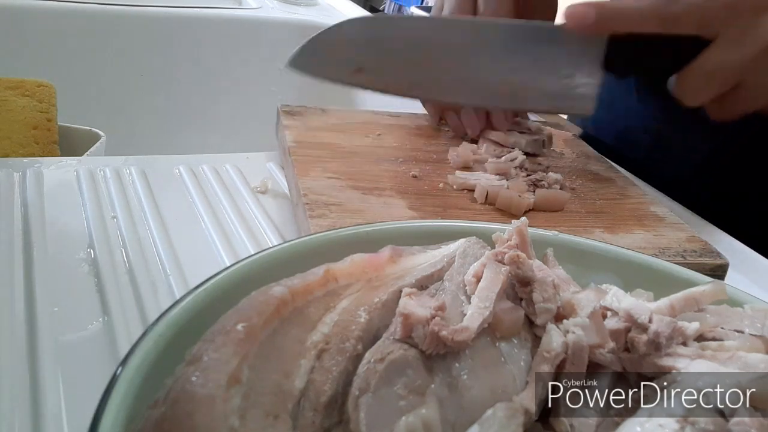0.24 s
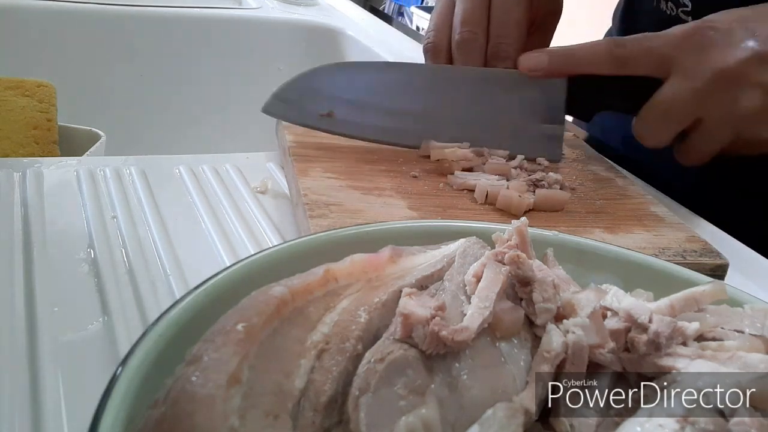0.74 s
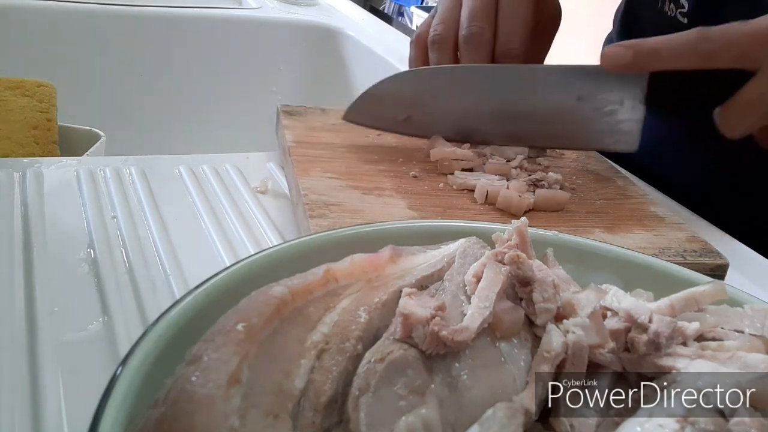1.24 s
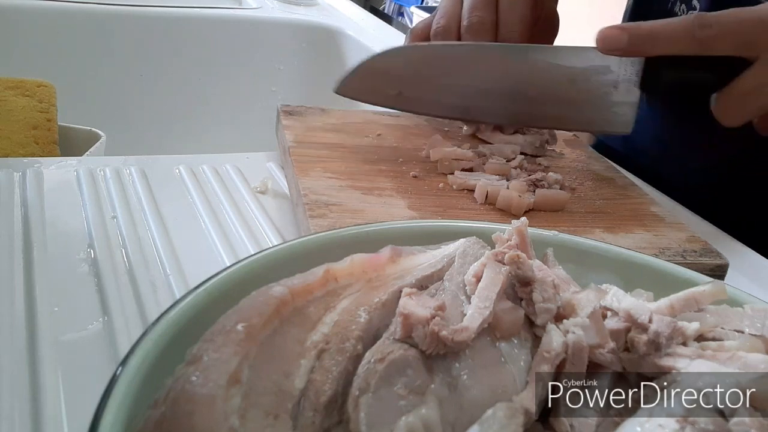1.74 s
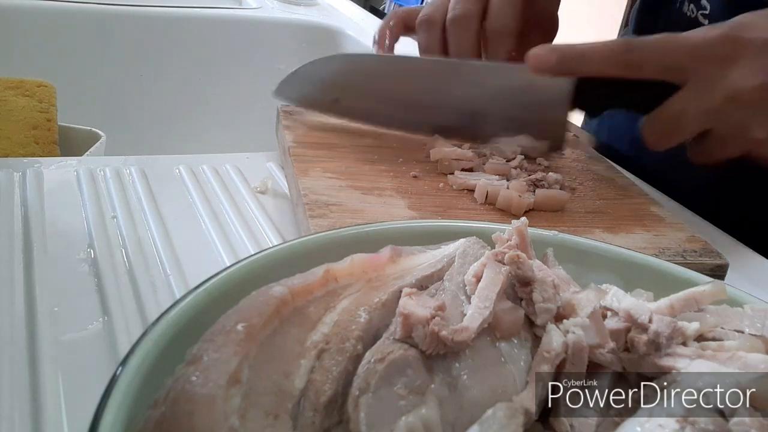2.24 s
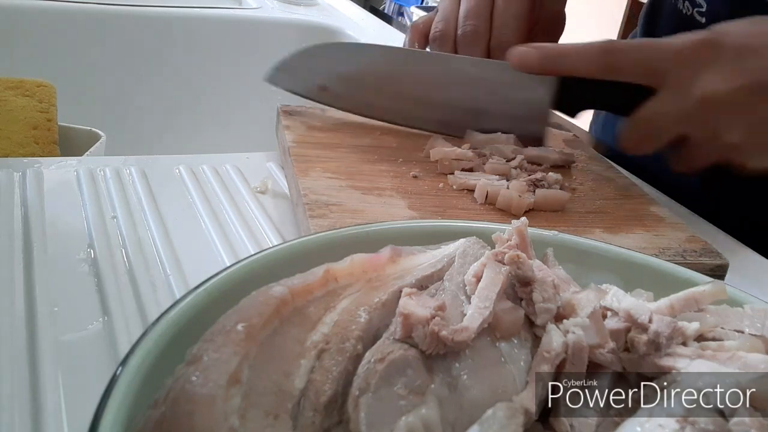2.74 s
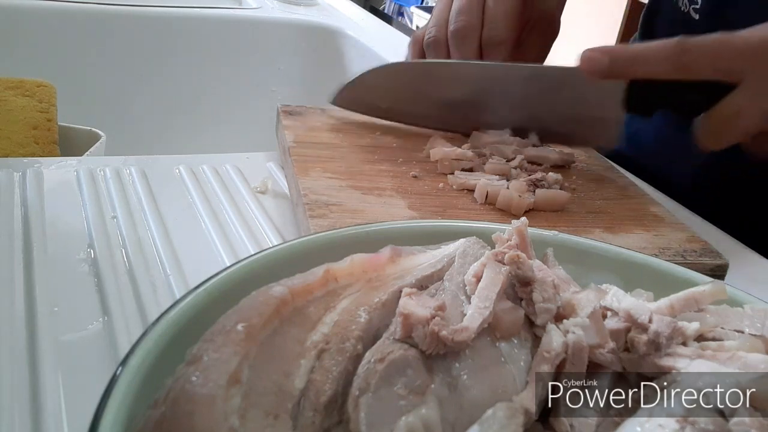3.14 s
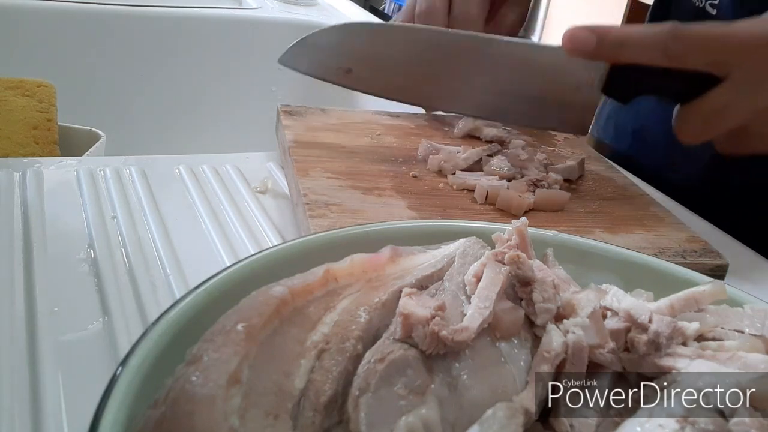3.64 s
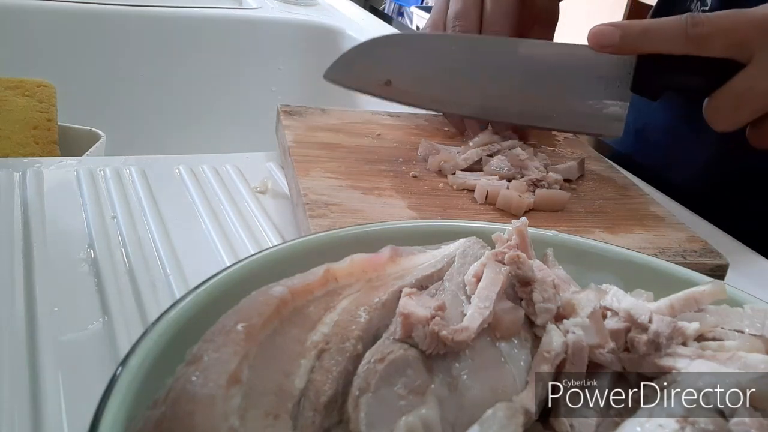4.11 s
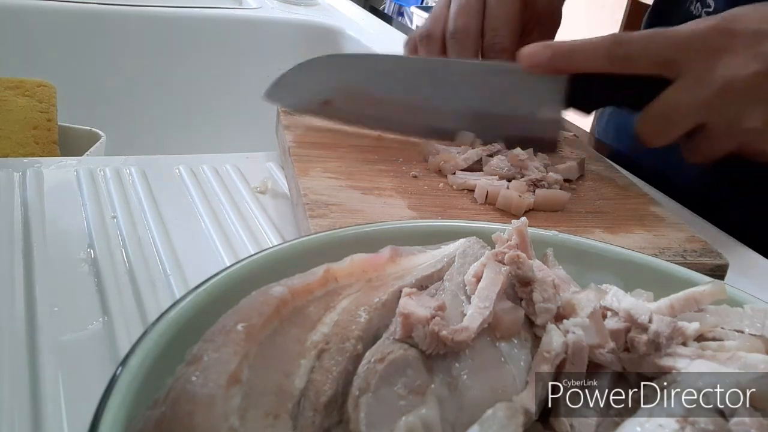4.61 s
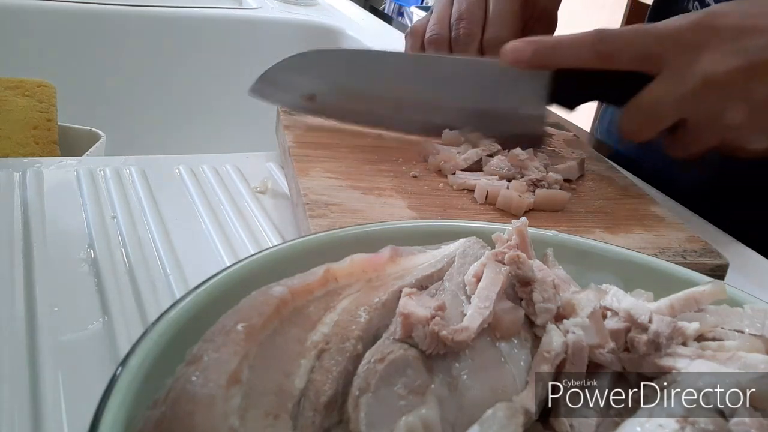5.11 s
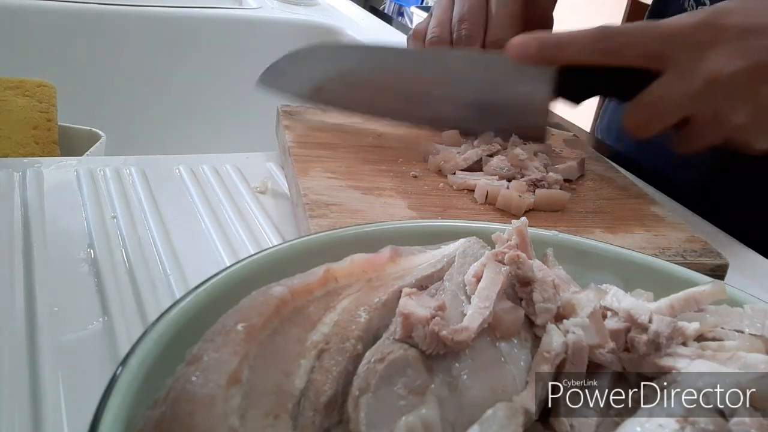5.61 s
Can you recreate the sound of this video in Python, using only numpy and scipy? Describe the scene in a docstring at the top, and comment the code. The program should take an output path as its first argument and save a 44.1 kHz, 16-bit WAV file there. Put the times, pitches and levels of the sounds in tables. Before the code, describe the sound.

A small kitchen with a continuous low, slightly wavering appliance hum and uneven, wide fan hiss. Close to the microphone, a knife cuts cooked meat on a wooden board. The tail of a stroke is heard at the start, then a bright wet smack at 0.6 s. A deep, dull knock lands at 0.8 s, a clearer woody one at 1.5 and a softer one at 2.2. The sharpest, loudest knock comes at 2.8 s. Three strokes follow closer together at 3.3, 3.5 and 3.8, the later ones lighter, with a tiny blade tone and squeak. After a pause, a weak stroke comes at 4.6, faint gliding squeaks until 5.1, a fuller knock there, and a last soft one at 5.6. Most strokes have a double bump from edge and heel, a short low boom, faint scraping and crisp wet tearing. Sticky smacks recur, and short reflections surround everything.

```python
"""Chopping cooked meat on a wooden board

In a small kitchen a knife squelches through meat and knocks on a board, a sum of decaying modes.
Tearing fibres and the dragging edge are showers of tiny filtered snaps; wet meat smacks in noise bursts.
Faint short gliding tones are the blade ringing near 1770 Hz, and squeaks.
Behind it an appliance runs steadily: wavering hum tones, and uneven fan noise shaped by resonances.
"""
import sys
import numpy as np
from scipy import signal
from scipy.fft import rfft, irfft
from scipy.io import wavfile
from scipy.ndimage import uniform_filter1d

SR = 44100
rng = np.random.default_rng(int(sys.argv[2]) if len(sys.argv) > 2 else 0)


def store_pcm(level_fs):
    """Save levels as 16-bit WAV."""
    pcm = np.round(np.clip(level_fs, -1, 1) * 32767).astype(np.int16)
    wavfile.write(sys.argv[1], SR, np.atleast_2d(pcm).T)


N = 258426  # length [samples]

# Levels are relative: later gains and the echoes shift most of them.
# Strokes: (time [s], clack level [dB], boom level [dB], thud level [dB], ring length [factor],
# hardness [dB per octave], heel delay [s], extra heel boom [dB], push length [s], pressure [dB])
STROKES = [(-.075, -36, -26, -28, 0.64, 0, .03, -8, .075, 2),
           (0.8265, -35, -14, -13, 0.35, -7, 0.026, -6, .058, -1),
           (1.486, -28, -16.5, -25, .95, -3, 0.03, -7, .086, -0.5),
           (2.196, -38.5, -20.5, -19, 0.27, 6, 0.034, -3, .09, -6.5),
           (2.796, -22.5, -13.5, -21.5, 0.94, -1.5, .021, -4, .076, 0),
           (3.3372, -32.5, -15, -26, 0.39, -6, .0265, 5.5, .074, 0.5),
           (3.536, -41.5, -25, -24.5, 0.37, -12.5, 0.019, -17, .035, -8),
           (3.829, -39.5, -22.5, -37, 0.47, -6, 0.022, -3, .035, -16),
           (4.597, -39, -32, -32, 0.61, 3, .035, -5, .055, 1),
           (5.116, -34.5, -19.5, -23.5, 0.68, -1, 0.039, -4, .065, -3),
           (5.582, -37, -33, -24.5, .57, 7, 0.016, 3.5, .086, -1.5)]
# Heel of the blade following the edge, before the stroke's extra boom: (clack level [dB],
# boom level [dB], thud level [dB], ring length [factor], hardness [dB per octave])
HEEL = (-42, -27, -34, 0.94, 4)
# Blade settling as the push ends, before the stroke's pressure: (clack level [dB],
# boom level [dB], thud level [dB], ring length [factor], hardness [dB per octave])
SETTLE = (-37.5, -26.5, -29, 0.35, 2)
# Upper modes of the board on the worktop, t60 before the ring length factor:
# (frequency [Hz], level [dB], t60 [s], build-up [s])
BOOM_MODES = [(257, -7, 0.13, 0.0046), (313.5, -6, 0.14, 0.0026), (333.6, -1, 0.27, 0.0057),
              (337, -28, 0.073, 0.0065)]
# Lower modes of the same: (frequency [Hz], level [dB], t60 [s], build-up [s])
THUD_MODES = [(133, -5.5, 0.13, 0.0037), (171.6, -6.5, 0.21, 0.013), (203, -14, 0.18, 0.0022)]
# Short modes of the wood, before hardness: (frequency [Hz], level [dB], t60 [s])
WOOD_MODES = [(413, -0.5, 0.039), (525, 2.5, 0.052), (594, -7, 0.055), (676, -1.5, 0.029), (797, -4, 0.044),
              (888, -4.5, 0.054), (1023, -8, 0.082), (1133, 0.5, 0.032), (1290, -11, 0.036),
              (1498, -1.5, 0.045), (1694, -4.5, .045), (2060, -33, 0.022), (2340, -11, 0.041),
              (2700, -16.5, .03), (4200, -14, 0.028)]
# Drag of the edge on the wood, before pressure: (attack [s], release [s], level [dB])
SCRAPE = (.012, 0.015, -45.5)
# Tearing of the meat, before pressure: (attack [s], release [s], level [dB])
SQUELCH = (0.0085, 0.021, -53.5)
# Dense modes of the wood under a dragging edge: (frequency [Hz], level [dB])
SCRAPE_SPECTRUM = [(40, -64), (200, -8), (430, 6), (560, 2.5), (720, -6.5), (1100, 2), (1350, -3.5),
                   (1750, 1), (2300, -9), (3200, -12.5), (6000, -23.5), (15000, -43)]
# Spectrum of the wet snaps: (frequency [Hz], level [dB])
FIZZ_SPECTRUM = [(1500, -31), (3000, 2), (4500, 3.5), (7000, 0), (9000, 3), (11000, -1), (12500, 2.5),
                 (15500, 0)]
# Fingers shifting the meat between strokes: (time [s], level [dB])
NUDGES = [(.325, -54.5), (1.317, -54), (1.885, -55), (4.03, -53)]
# Wet meat parting from steel or fingers: (time [s], level [dB], centre frequency [Hz])
SMACKS = [(0.5959, -31.5, 10800), (.603, -37, 12000), (1.478, -44, 9000), (2.932, -37, 9500),
          (3.796, -38.5, 5860), (3.944, -43.5, 13000), (4.628, -41, 8000), (5.229, -36.5, 12700),
          (5.33, -40.5, 6000)]
# Faint short tones, the blade ringing near 1770 Hz, and squeaks:
# (time [s], length [s], start frequency [Hz], end frequency [Hz], level [dB])
SHORT_TONES = [(0.821, 0.017, 1750, 1770, -40), (3.547, .029, 1777, 1770, -43),
               (3.556, 0.053, 830, 794, -42), (4.797, 0.039, 2480, 2670, -47),
               (4.912, 0.073, 2300, 2004, -44.5), (4.992, 0.016, 695, 716, -35),
               (5.063, 0.014, 735, 720, -41), (5.29, 0.066, 4250, 4080, -57)]
# Mains hum and fan tones, rms before the waver:
# (frequency [Hz], rms level [dB], phase between the ears [rad], waver [share of the tone])
HUM_TONES = [(100.6, -44.5, 0.22, .03), (199, -60, 0.18, 0.88), (287.9, -45.5, 0.12, 0.63),
             (294.3, -42.5, 0.29, 0.047), (389.8, -53.5, 0.47, 0.19), (390.8, -63, 0.5, 0.13),
             (579.5, -54.5, 2.44, 0.36), (592.3, -59.5, 1.26, 0.54), (601.7, -58.5, 1.3, 0.34),
             (703, -75, 0.43, .2), (863, -69.5, .4, 0.24), (881.5, -61, 1.77, 0.53), (3350, -69, 1.4, 0.34)]
# Rush of air from the fan: (frequency [Hz], relative spectral level [dB])
AIR_SPECTRUM = [(20, -26), (45, -5), (65, -3), (130, 1.5), (400, 0), (650, -5), (1150, -3), (1400, -7),
                (2200, -5), (3500, -14), (7000, -17), (11000, -19.5), (13000, -18.5), (15500, -22.5)]
# Resonances that the air excites: (frequency [Hz], width [Hz], level above the rush [dB])
DUCT_RESONANCES = [(177, 12, 6), (209, 34, 5.5), (260, 18, 10), (293, 27, 10.5), (341.2, 31, 15.5),
                   (483, 130, 2), (4230, 740, 5.5), (9000, 550, 4), (12100, 300, 3.5)]
# Likeness of the air in the two ears: (frequency [Hz], left-right correlation [-1 to 1])
EAR_CORRELATION = [(50, 0.63), (180, 1), (280, 0.84), (350, 0.64), (430, -0.022), (560, 0.31), (720, 0.94),
                   (950, -0.21), (2000, -0.016), (15000, -0.039)]
# Balance of the air: (frequency [Hz], left minus right [dB])
EAR_BALANCE = [(300, -1.5), (1000, -1.5), (3000, -1.2), (7000, -3), (10000, 0), (15000, 0)]
# Unevenness of the hiss: (frequency [Hz], depth [dB])
UNEVEN_DEPTH = [(400, -0.2), (1000, 1.5), (2200, 2), (4000, 2), (14000, 2)]
# Decay of the room: (frequency [Hz], t60 [s])
ROOM_DECAY = [(150, 0.38), (500, 0.27), (1500, 0.29), (5000, 0.46), (14000, 0.12)]

MEAT_LEAD_S = 0.012  # the edge enters the meat before it reaches the wood
SCRAPE_PER_S, SQUELCH_PER_S, SNAP_SPREAD_DB = 380, 1500, 2.5  # mean snap rates, size spread
NUDGE_HALF_S = .032


def knocks():
    """Impact excitation: each landing gives a woody clack and sets the modes of the board booming."""
    low, clack = np.zeros(N), np.zeros((2, N))
    for s, clack_db, boom_db, thud_db, length, hardness in contacts():
        boom = amp(boom_db) * ring(BOOM_MODES, length, bloom_s=0.01527)
        thud = amp(thud_db) * ring(THUD_MODES, length, bloom_s=0.0082)
        add(low, s, boom + thud)
        add(clack, s, amp(clack_db - 3) * whack(hardness, clack_db))
    board = kitchen(low, early_db=-22, tail_db=-20, early_s=.012)
    board += kitchen(clack, early_db=-3.5, tail_db=-3.0, early_s=0.0047) * amp([[-.7], [.7]])
    # a board this small radiates almost no deep bass
    return signal.sosfilt(signal.butter(3, 105, "highpass", fs=SR, output="sos"), board)


def contacts():
    """Successive impacts: the edge lands, the heel follows, the blade settles as the push ends."""
    for s, *edge, heel_s, rock_db, push_s, press_db in STROKES:
        yield s, *edge
        clack_db, boom_db, thud_db, length, hardness = HEEL
        yield s + heel_s, clack_db, boom_db + rock_db, thud_db, length, hardness
        clack_db, boom_db, thud_db, length, hardness = SETTLE
        yield s + push_s, clack_db + press_db, boom_db + press_db, thud_db + press_db, length, hardness


def ring(modes, length, bloom_s):
    """Modal build-up and damping: modes swell as the blow spreads into the worktop, then die away."""
    t = np.arange(SR // 2) / SR
    sound = 0
    for hz, db, t60, rise_s in modes:
        # a pressed blade shortens the decay
        decay = amp(db - 60 * t / (t60 * max(length, .1)))
        swell = 1 - np.exp(-t / rise_s)
        # the modes fall into step at bloom_s
        sound = sound + decay * swell * np.cos(2 * np.pi * hz * (t - bloom_s))
    return sound


def whack(hardness, blow_db):
    """Contact time: meat cushions a light blow, so the short wood modes start more slowly."""
    t = np.arange(SR // 5) / SR
    hz, db, t60 = np.transpose(WOOD_MODES)[:, :, None]
    # phases depend on where the edge lands and, more so at high frequency, on the ear
    landing = 0.35 * rng.random((len(hz), 1))
    ear = np.minimum(hz / 1500, 1) * rng.random((2, len(hz), 1))
    level = amp(db + hardness * np.log2(hz / 1000) - 60 * t / t60)
    modes = level * np.sin(2 * np.pi * (hz * t + landing + ear))
    contact_s = .0007 * amp(-.7 * (blow_db + 23))
    return modes.sum(1) * (1 - np.exp(-t / contact_s))


def cuts():
    """Fracture and friction: fibres tear in wet snaps, the edge drags on wood, shifted meat fizzes."""
    t = np.arange(N) / SR
    nudges = sum(amp(db) * np.exp(-((t - s) / NUDGE_HALF_S) ** 2) for s, db in NUDGES)
    tearing = drag(t + MEAT_LEAD_S, *SQUELCH)
    wet = (tearing + nudges) * snaps(FIZZ_SPECTRUM, SQUELCH_PER_S)
    scrape = drag(t, *SCRAPE) * snaps(SCRAPE_SPECTRUM, SCRAPE_PER_S)
    return kitchen(wet + scrape, early_db=0.5, tail_db=-4, early_s=0.004) * amp([[-3], [-1.5]])


def drag(t, attack_s, release_s, db):
    """Friction under load: the hand bears down, holds for the length of the push, and lets go."""
    envelope = 0
    for s, *_, push_s, press_db in STROKES:
        attack = np.clip((t - s) / attack_s, 0, 1)
        release = np.exp(-np.maximum(t - s - push_s, 0) / release_s)
        envelope = envelope + amp(db + press_db) * attack * release
    return envelope


def snaps(spectrum, per_s):
    """Shot noise: a random train of tiny snaps of uneven size, coloured and scaled to rms 1."""
    sizes = amp(SNAP_SPREAD_DB * np.minimum(rng.exponential(1, N), 3)) * rng.choice([-1, 1], N)
    train = (rng.random(N) < per_s / SR) * sizes
    return unit(signal.oaconvolve(train, click(lambda hz: read(spectrum, hz)))[:N])


def smacks():
    """Film rupture: a film of juice snaps in a few milliseconds of bright crackle with a room wash."""
    out, t = np.zeros((2, N)), np.arange(SR // 4) / SR
    parting = 1 - np.exp(-(t / .0025) ** 2)
    # the crackle dies quickly, the wash slowly
    shape = parting * (np.exp(-t / 0.0063) + amp(-5.0) * np.exp(-t / 0.049))
    for s, db, centre_hz in SMACKS:
        colour = click(lambda hz: -10 * np.log10(1 + (hz / centre_hz - centre_hz / (hz + 50)) ** 2))
        colour = colour / np.linalg.norm(colour)
        burst = shape * rng.standard_normal((2, len(t)))
        add(out, s - .001, amp(db - 4) * signal.fftconvolve(burst, colour[None], axes=1))
    return out * amp([[-1.3], [1.2]])


def short_tones():
    """Frequency modulation: blade rings and squeaks as brief gliding sines, rough in pitch and level."""
    out, wobble, roughness = np.zeros(N), drift(400), 1 + .3 * drift(250)
    for s, length_s, start_hz, end_hz, db in SHORT_TONES:
        size, first = int(length_s * SR), int(s * SR)
        hz = np.linspace(start_hz, end_hz, size) * (1 + .025 * wobble[first:][:size])
        envelope = signal.windows.tukey(size, .7) * roughness[first:][:size]
        add(out, s, amp(db - 4.0) * envelope * np.sin(2 * np.pi * np.cumsum(hz) / SR))
    return kitchen(out, early_db=-6, tail_db=-2, early_s=.008)


def hum():
    """Interaural phase: steady motor tones waver and reach each ear in their own phase."""
    t, out = np.arange(N) / SR, 0
    for hz, db, apart, waver in HUM_TONES:
        # a complex waver moves both level and phase
        wander = 1 + waver * (drift(2.55) + 1j * drift(2.7)) / np.sqrt(2)
        tone = wander * np.exp(2j * np.pi * (hz * t + rng.random()))
        ears = np.exp(.5j * apart * np.array([[-1], [1]]))
        out = out + np.sqrt(2) * amp(db) * (tone * ears).real
    return out


def air():
    """Resonant filtering of fan noise, with a correlation between the ears that varies with frequency."""
    hz = np.fft.rfftfreq(N, 1 / SR)
    left, other = rfft(rng.standard_normal((2, N)))
    alike = np.clip(read(EAR_CORRELATION, hz), -1, 1)
    ears = np.array([left, alike * left + np.sqrt(1 - alike ** 2) * other])
    peaks = 0  # extra power at the resonances
    for f, width, db in DUCT_RESONANCES:
        peaks = peaks + (amp(db) ** 2 - 1) / (1 + ((hz - f) / (width / np.sqrt(2))) ** 2) ** 2
    ears = ears * amp(read(AIR_SPECTRUM, hz)) * np.sqrt(abs(1 + peaks))
    ears *= amp(read(EAR_BALANCE, hz) * np.array([[.5], [-.5]]))
    return irfft(ears, N) * amp(-32.5 + 0.19 * drift(22))


def uneven_hiss(x):
    """Uneven hiss: patches of the spectrum rise and fall at random for a few hundredths of a second."""
    hz, _, z = signal.stft(x, SR, nperseg=1024, noverlap=768)
    patches = uniform_filter1d(rng.standard_normal(z.shape[1:]), size=4, axis=0)
    patches = unit(uniform_filter1d(patches, size=7, axis=1))
    gain = amp(read(UNEVEN_DEPTH, hz)[:, None] * patches)
    gain = gain / np.sqrt((gain ** 2).mean(1, keepdims=True))  # keeps the mean power gain at 1
    return signal.istft(z * gain, SR, nperseg=1024, noverlap=768)[1][:, :N]


def kitchen(x, early_db, tail_db, early_s):
    """Room reflection: direct sound, echoes from worktop and sink, and a tail, separate for each ear."""
    t = np.arange(SR // 2) / SR
    near, far = rng.standard_normal((2, 2, len(t)))
    near *= (rng.random(near.shape) < .15) * np.exp(-t / early_s) * (t > .0007)
    # the tail grows in, then each band decays at its own rate
    hz, when, z = signal.stft(far * (1 - np.exp(-t / 0.0073)), SR, nperseg=256)
    z = z * amp(-60 * when / read(ROOM_DECAY, hz)[:, None])
    far = signal.istft(z, SR, nperseg=256)[1][:, :len(t)]
    echoes = (amp(early_db) * unit(near) + amp(tail_db) * unit(far)) / np.sqrt(len(t))
    return x + signal.fftconvolve(np.atleast_2d(x), echoes, axes=1)[:, :N]


def click(colour, size=2048):
    """Minimum phase: a causal click whose spectrum in dB is colour(Hz)."""
    log_gain = np.log(amp(colour(abs(np.fft.fftfreq(size, 1 / SR)))))
    return np.fft.ifft(np.exp(np.conj(signal.hilbert(log_gain)))).real


def drift(hz):
    """Band-limited chance: Gaussian-filtered noise of rms 1, up to about hz."""
    low_pass = np.exp(-(np.fft.rfftfreq(N, 1 / SR) / hz) ** 2)
    return unit(irfft(rfft(rng.standard_normal(N)) * low_pass, N))


def amp(db):
    """Logarithmic level: decibels to amplitude gain."""
    return 10 ** (np.asarray(db) / 20)


def unit(x):
    """Effective value: scales a signal to rms 1."""
    return x / np.sqrt(np.mean(x ** 2) + 1e-20)


def read(points, hz):
    """Logarithmic pitch: interpolates a spectrum on a log-frequency axis."""
    f, value = np.transpose(points)
    return np.interp(np.log(hz + 1), np.log(f + 1), value)


def add(mix, s, sound):
    """Superposition: adds a sound to the mix at time s, cut at both ends of the mix."""
    first = round(s * SR)
    sound = sound[..., max(-first, 0):]
    part = mix[..., max(first, 0):][..., :sound.shape[-1]]
    part += sound[..., :part.shape[-1]]


def scene():
    """Superposition: knife work over the hum and air of the kitchen."""
    return knocks() + cuts() + smacks() + short_tones() + hum() + uneven_hiss(air())


def record(dry):
    """Band limitation: a linear-phase low-pass at 15.5 kHz."""
    low_pass = signal.firwin(701, 15500, window=("kaiser", 9), fs=SR)
    return signal.oaconvolve(dry, low_pass[None], "same")


dry = scene()
out = record(dry)
store_pcm(out)
```